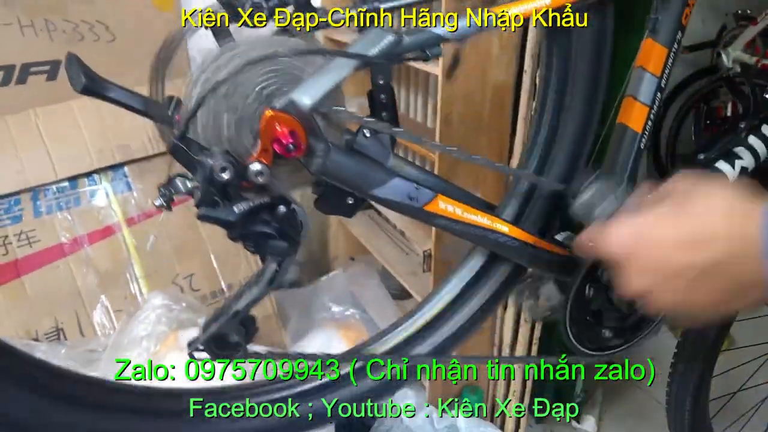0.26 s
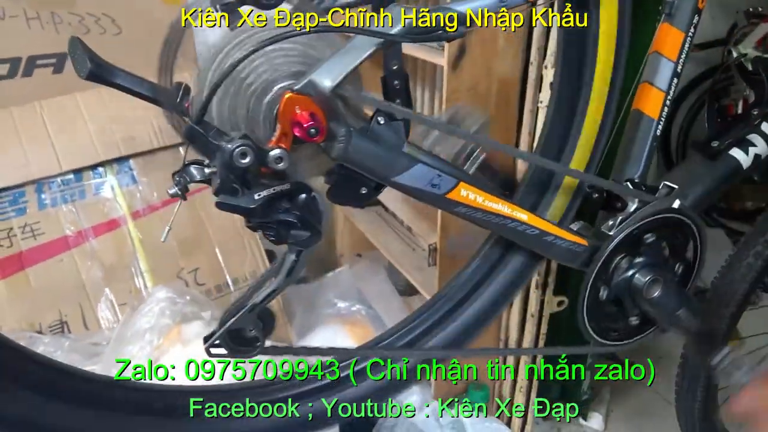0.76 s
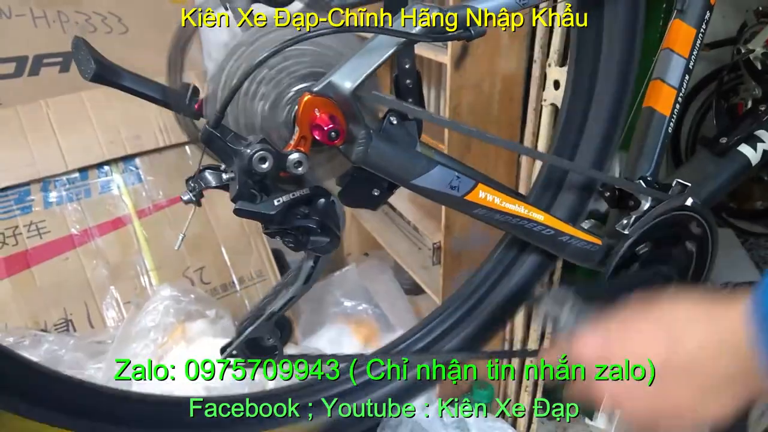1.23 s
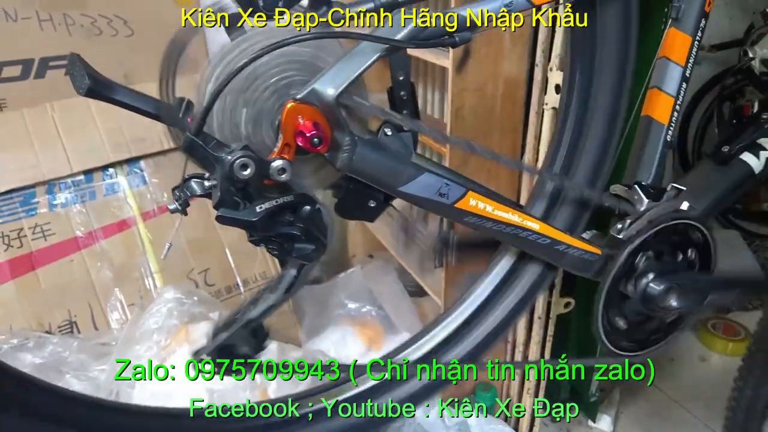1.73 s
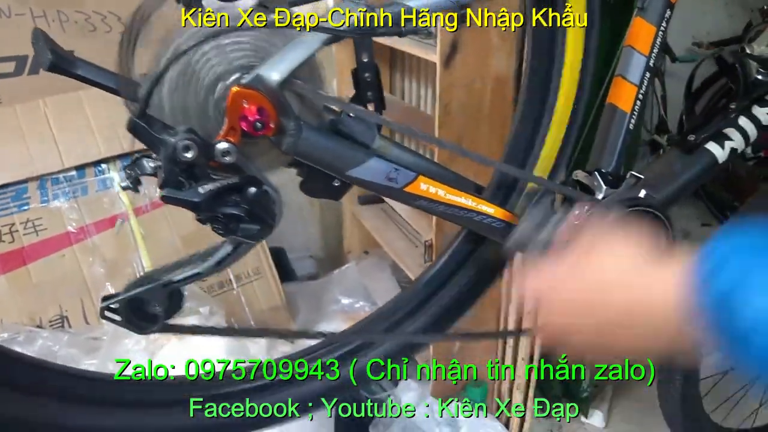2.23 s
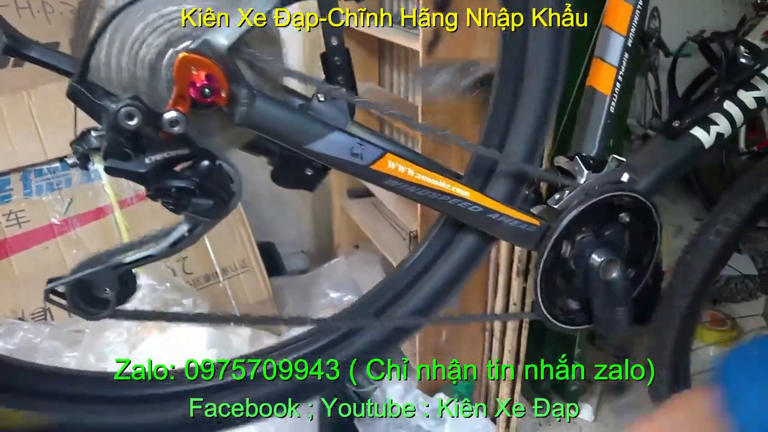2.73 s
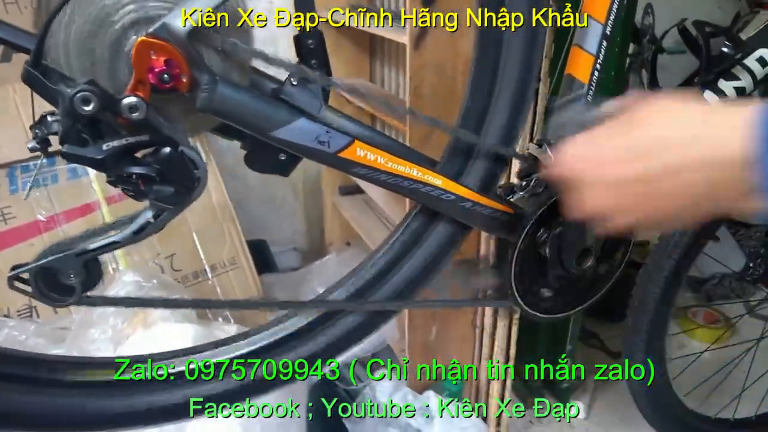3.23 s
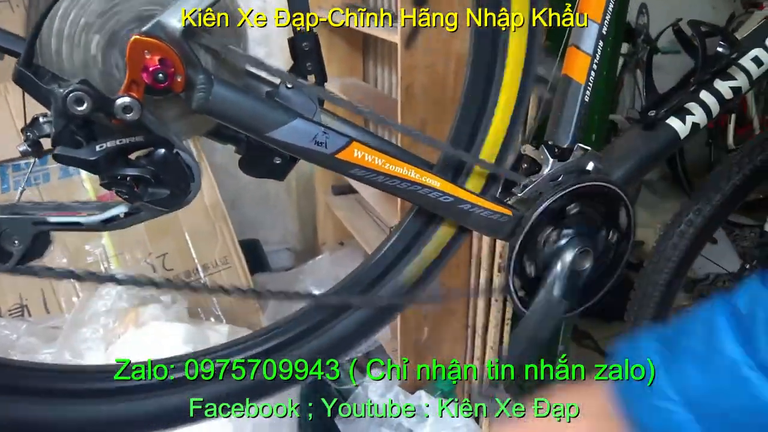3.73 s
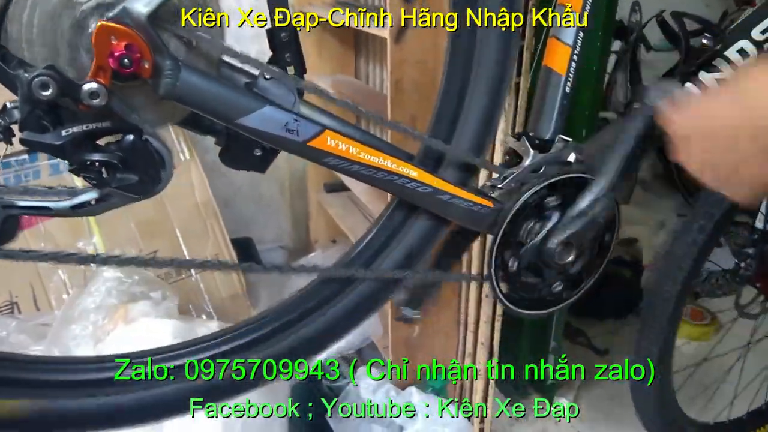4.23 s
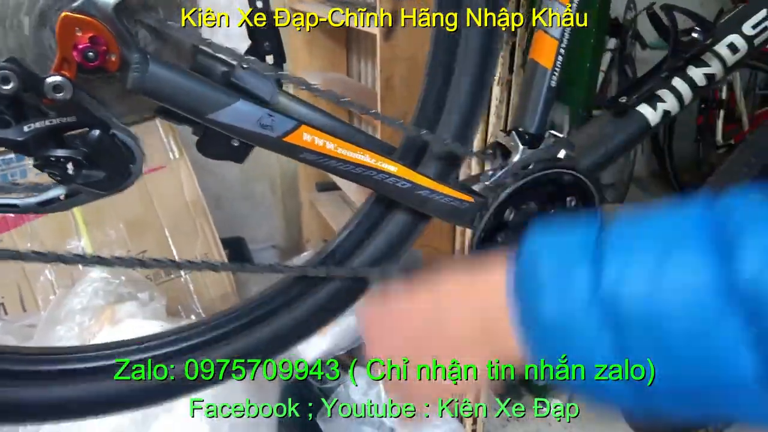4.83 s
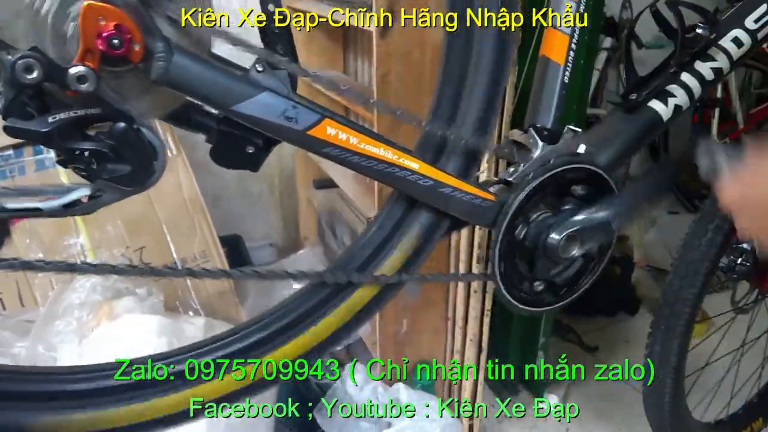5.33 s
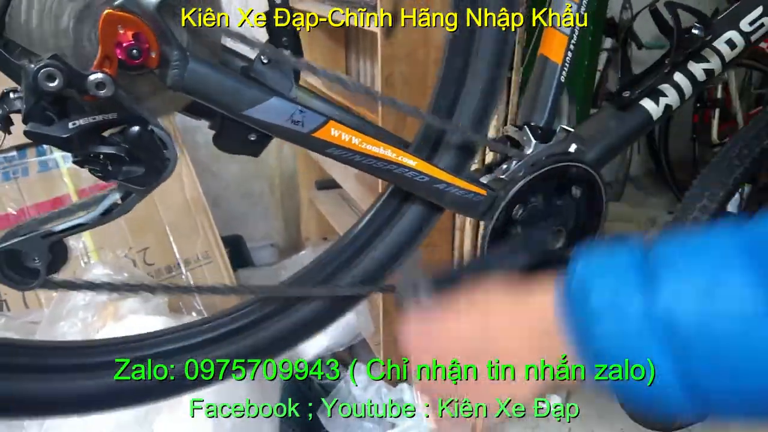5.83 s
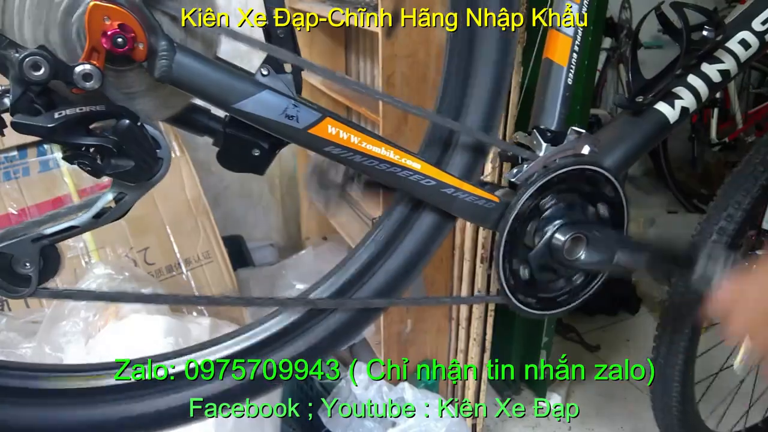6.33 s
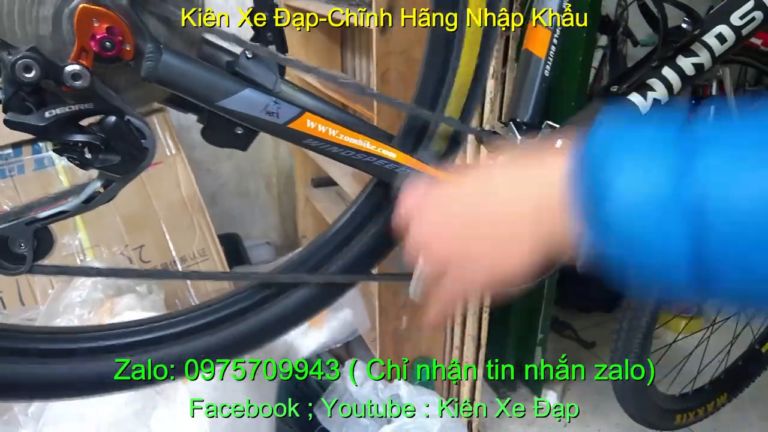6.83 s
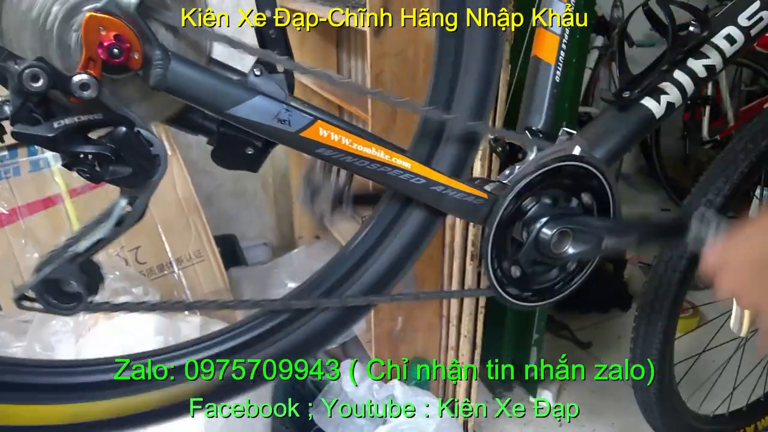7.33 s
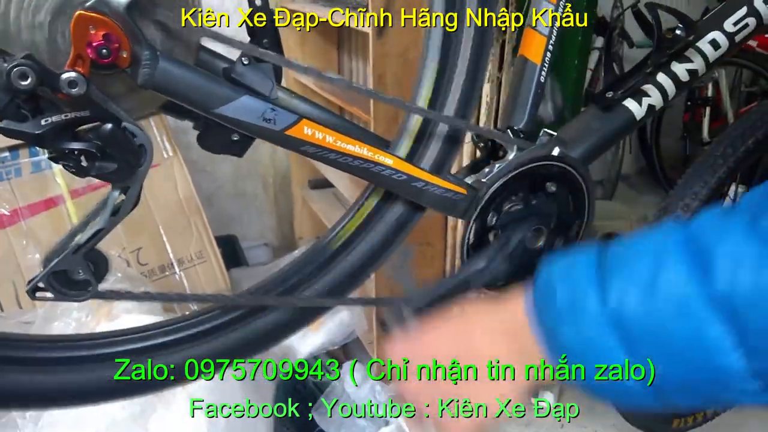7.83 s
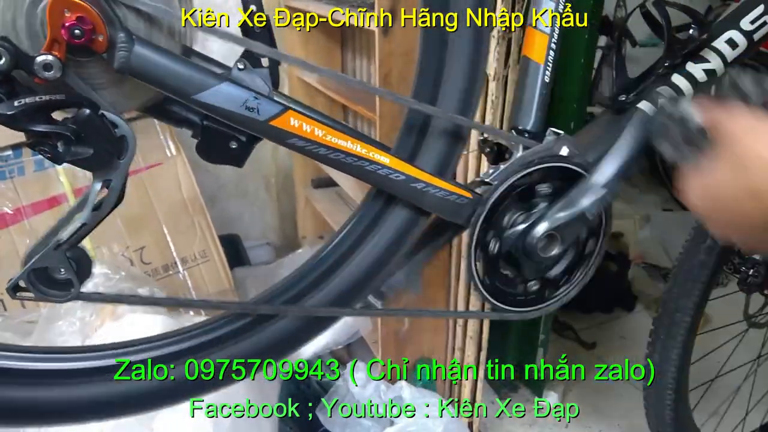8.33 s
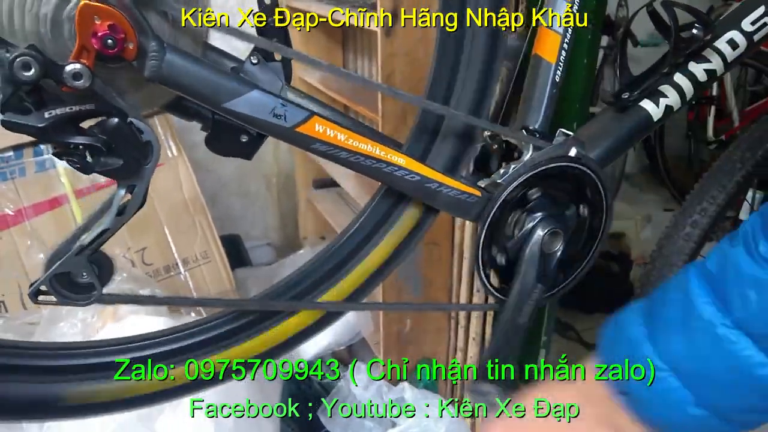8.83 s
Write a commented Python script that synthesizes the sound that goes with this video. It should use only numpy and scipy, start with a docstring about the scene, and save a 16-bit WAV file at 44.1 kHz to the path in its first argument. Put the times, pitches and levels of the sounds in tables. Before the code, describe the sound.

A hand-cranked bicycle chain ticks steadily over the rear sprockets, with runs of ringing clicks, clanks and scrapes as the gears shift.

```python
"""First comes a run of ringing clicks: a bicycle chain catching on sprocket teeth between two gears.
The bike is on a workstand in a small shop, cranked by hand while its rear gears are shifted.
The chain ticks link by link, scrapes along the sprockets and drops onto the next one with a clank.
The wheel whirrs softly and the stand rumbles. Dull knocks, most likely from the gear shifter,
ring through the frame."""
import sys
import numpy as np
from scipy import signal
from scipy.fft import rfft, irfft
from scipy.io import wavfile
from scipy.ndimage import uniform_filter1d

SR = 44100
rng = np.random.default_rng(int(sys.argv[2]) if len(sys.argv) > 2 else 0)


def store_pcm(level_fs):
    """Save levels as 16-bit WAV."""
    pcm = np.round(np.clip(level_fs, -1, 1) * 32767).astype(np.int16)
    wavfile.write(sys.argv[1], SR, np.atleast_2d(pcm).T)


N = 400428
TIME = np.arange(N) / SR
AGE = TIME[:SR // 5]  # seconds since a hit

# the chain catches on a tooth (time [s], strength [dB])
TOOTH_CLICKS = [(0.018, -18), (0.0807, -15.5), (.1337, -17), (0.189, -16.5), (.2478, -16), (0.3122, -17),
                (0.582, -18.5), (1.0059, -20.5), (2.9784, -17), (3.0791, -16.5), (3.1893, -18),
                (3.2328, -20.5), (3.2977, -15), (3.4438, -15.5), (3.5268, -15.5), (3.7337, -16),
                (3.811, -18.5), (3.8662, -16.5), (3.922, -17), (3.9687, -17), (4.0129, -15.5),
                (4.053, -17.5), (4.0952, -18), (4.135, -17), (4.1747, -18), (4.2173, -17), (4.261, -15.5),
                (4.3064, -15.5), (4.352, -16.5), (4.4, -16.5), (4.4536, -16.5), (4.537, -17.5),
                (4.6439, -17.5), (4.7162, -17.5), (4.7723, -16.5), (4.8182, -15.5), (4.8599, -16.5),
                (4.907, -16.5), (4.9571, -13.5), (5.0059, -16), (5.033, -16), (5.0728, -17.5),
                (5.1122, -16), (5.1578, -15), (5.1856, -15), (5.245, -16), (5.269, -18), (5.2932, -18.5),
                (5.339, -16.5), (5.3766, -15), (5.406, -20.5), (6.825, -17.5), (7.1248, -17.5)]
# the sprocket's ring compared with the click (time [s], level [dB])
RING_LEVEL = [(1, -14), (3, -10.5)]
# the chain drops onto a sprocket (time [s], clank [dB], crack [dB], how long links keep landing [s])
CHAIN_DROPS = [(1.411, -16.5, -15, .0095), (1.583, -18.5, -39, .0077), (2.071, -32, -19.5, 0.011),
               (3.1, -15, -15, 0.01), (3.721, -26.5, -19.5, .006), (7.078, -27, -37, 0.01),
               (7.14, -26.5, -24, 0.0086), (7.166, -22.5, -12.5, 0.0054)]
# how fast the chain runs (time [s], speed [links/s])
CHAIN_SPEED = [(0.0, 35.91), (0.61, 38.77), (1.44, 36.24), (1.89, 39.41), (2.09, 35.72), (2.39, 37.82),
               (4.02, 37.41), (5.65, 34.7), (6.32, 36.21), (6.77, 34.53), (7.22, 36.42), (7.73, 35.73),
               (8.31, 36.33), (9.08, 37.39)]
# how hard links land on the teeth (time [s], level [dB])
TICK_LEVEL = [(0.5, -43), (2.6, -44.5), (6.3, -46.5), (9, -44.5)]
# the chain rides between two sprockets (start [s], end [s])
BETWEEN_GEARS = [(0, 0.41), (3.75, 5.42)]
# stiff links snap into place (time [s], strength [dB])
LINK_SNAPS = [(1.963, -30.5), (2.011, -26), (2.18, -23.5), (2.244, -33), (2.267, -43), (2.687, -24),
              (2.7588, -26), (5.468, -21.5), (5.603, -23.5), (5.775, -29.5), (5.623, -28.5), (5.913, -21),
              (6.086, -27), (6.764, -40), (7.271, -21.5), (7.431, -27.5), (7.488, -32), (7.677, -23),
              (7.785, -24), (7.797, -28)]
# the derailleur (chain guide) presses the chain on a sprocket (start [s], length [s], level [dB])
SIDE_SCRAPES = [(1.422, 0.084, -36), (3.138, 0.071, -35), (4.99, 0.2, -30.5), (5.244, 0.054, -25),
                (5.32, 0.085, -35.5), (6.816, .065, -38.5), (6.933, 0.27, -37.5), (7.28, 0.055, -45)]
# the chain rubs while out of line (time [s], level [dB])
RUB_LEVEL = [(0, -43.5), (1.3, -57), (1.8, -48), (2.4, -53.5), (3.3, -44), (5.3, -44.5), (5.8, -54),
             (9, -59)]
# the stand's low rumble (time [s], level [dB])
RUMBLE_LEVEL = [(0, -63.5), (4.2, -61), (6.5, -62.5), (8.3, -62), (9.08, -49)]
# shifter and crank knock on the frame (time [s], blow [dB], low ring [dB], upper ring [dB])
FRAME_KNOCKS = [(1.502, -40.5, -48.5, -58), (4.775, -36.5, -59, -70), (5.288, -34.5, -45, -60),
                (6.139, -53, -56, -63), (6.195, -57, -60, -79), (6.895, -36.5, -69, -54),
                (7.371, -26, -35.5, -43), (7.535, -47, -48, -63), (7.632, -43.5, -56, -73),
                (8.127, -50.5, -52.5, -70), (8.436, -31, -36, -38), (8.485, -45, -46, -42),
                (9.007, -40, -69, -49.5)]
# a faint tone in the frame (start [s], length [s], level [dB])
FRAME_SINGING = [(8.47, 0.25, -65), (8.825, 0.042, -48.5), (8.98, .1, -61.5)]

# The tones each part rings with (pitch [Hz], level [dB], t60 [s]); t60 is the time to fade by 60 dB.
SPROCKET_TONES = [(2012, -18, .16), (2198, -12, .11), (2375, -4, .06), (2452, 0, .09), (2735, -2, .06),
                  (2808, -1, .07), (2910, -4, .045), (3230, -7, .05), (3560, -6, .07), (3760, -5, .05),
                  (4565, -20, .16), (4922, -13, .2), (5720, 0, .04), (9205, -4, .045)]
STACK_TONES = [(913, -23, 0.049), (1037, -20.5, 0.039), (1370, -44, 0.056), (2125, -11, 0.044),
               (2740, -25, 0.089), (2640, -16, 0.086), (3660, -12, 0.038), (3645, 6, 0.015),
               (3620, -4, 0.012), (3960, -17, 0.02), (6040, -10, 0.033)]  # all the sprockets together
CAGE_TONES = [(3220, -19, 0.014), (3426, 3, 0.042), (3580, -8, 0.049), (3740, -39, .04), (5100, -10, .02),
              (9000, -15, .02)]  # the derailleur's pulley and its cage
FRAME_TONES = [(175, -12, .2), (356, -1, .21), (436, -7, .42), (624, -13, .3), (886, 0, .5), (958, -9, .3),
               (1227, -10, .35), (1324, -8, .2), (1408, -8, .2), (1780, -5, .24), (2014, -3, .24),
               (2320, -9, .2), (2460, -4, .15), (2740, -11, .25)]

# The colour of each noise, from bass to treble (frequency [Hz], relative level [dB])
CRACK_COLOUR = [(300, -40), (1500, -10.5), (2400, 3), (3700, 6), (4400, -3), (5800, 8.5), (6800, -1.5),
                (8600, 2), (9200, 4), (10200, 0.5), (12000, -1.5), (14000, 3), (15500, 2), (17000, 10.5)]
THUD_COLOUR = [(40, -29), (110, -17), (175, 4), (270, 1.5), (400, -18), (580, -16), (1000, 11), (1500, 14),
               (2500, -21), (8000, -42)]
CLANK_COLOUR = [(200, -26.5), (800, -19.5), (1100, -14), (1700, -19), (2500, -6.5), (3050, -12),
                (3600, -3.5), (4400, -10.5), (5300, -15.5), (6500, -14.5), (9000, -24), (16000, -24)]
TICK_COLOUR = [(300, -21), (1500, -19), (2700, -5), (3500, -0.5), (4300, 0.5), (5600, 4.5), (7000, -3),
               (8300, -2), (9600, 0.5), (11500, -8.5), (16000, -10)]
SCRAPE_COLOUR = [(100, -15), (250, -3.5), (500, -7.5), (1200, 0), (2200, -1.5), (2800, 6), (3500, 8.5),
                 (4500, 3.5), (6000, 3), (8000, 2), (10000, -1), (12000, -4.5), (16000, -8.5)]
SHOP_COLOUR = [(12, -35), (20, 4), (60, 0), (116, -7.5), (158, 9), (459, -1), (802, 4), (1910, -2.5),
               (3160, -3), (3440, -4.5), (4060, -7.5), (5530, -29), (6360, -29), (9140, -26.5),
               (16000, -35)]
RUMBLE_COLOUR = [(15, -29), (35, -25), (52, -5), (68, -12.5), (95, -14), (200, -26), (600, -32.5)]
BLOW_COLOUR = [(60, -27), (130, -21), (220, 0), (400, -4), (650, -2), (1000, -0.5), (1400, -1.5), (2100, 2),
               (3000, 0.5), (3800, 1), (5000, -10.5), (8000, -17), (16000, -25)]

# how long the shop echoes (frequency [Hz], t60 [s])
ECHO_FADE = [(150, 0.47), (1000, 0.24), (3000, 0.19), (8000, 0.078), (16000, 0.15)]
# how alike the two microphones sound (frequency [Hz], likeness [0 to 1])
MIC_LIKENESS = [(100, 0.82), (300, 0.7), (600, 0.58), (1200, 0.46), (2400, 0.11), (8000, 0)]
# which microphone is louder (frequency [Hz], left minus right [dB])
MIC_BALANCE = [(60, -2), (200, -5), (400, -4.5), (1300, -1), (2400, -3.5), (4400, -6), (6200, -1.5),
               (8100, 2.5), (10500, 1.5), (12500, 3), (15000, -0.5)]


def gain_of(db):
    """Turns decibels into a number to multiply a sound by."""
    return 10 ** (np.asarray(db) / 20)


def evened(x):
    """Scales a signal to an average power of 1."""
    return x / np.sqrt(np.mean(x ** 2) + 1e-20)


def at_pitch(table, hz):
    """Reads a table between its rows, on a log-frequency axis."""
    row_hz, value = np.transpose(table)
    return np.interp(np.log(hz + 1), np.log(row_hz + 1), value)


def at_time(table, s):
    """Reads a table at the times s."""
    return np.interp(s, *np.transpose(table))


def add(mix, s, sound):
    """Adds a stereo sound at time s."""
    part = mix[:, max(round(s * SR), 0):][:, :sound.shape[1]]
    part += sound[:, :part.shape[1]]


def tint(x, colour, size=4096):
    """Gives a sound a colour, with a filter that never rings ahead of a hit."""
    log_gain = np.log(gain_of(at_pitch(colour, abs(np.fft.fftfreq(size, 1 / SR)))))
    response = np.exp(np.conj(signal.hilbert(log_gain)))
    taps = np.fft.ifft(response).real[:size // 2]
    return signal.oaconvolve(x, taps[None] / np.linalg.norm(taps), axes=1)[:, :x.shape[1]]


def chatter(t60, hold=0, grain=0.48, rise=0.00029):
    """Steel parts rattle together: a lumpy burst of tiny impacts that holds, then dies."""
    lumps = np.exp(grain * np.repeat(rng.standard_normal(len(AGE)), 30)[:len(AGE)])
    swell = (1 - np.exp(-AGE / rise)) * gain_of(-60 * np.maximum(AGE - hold, 0) / t60)
    burst = rng.standard_normal((2, len(AGE))) * lumps * swell
    return burst / np.sqrt(np.sum(burst ** 2) / (2 * SR / 100) + 1e-20)  # same energy every time


def ring(tones, t, scatter_db, detune, blur_hz):
    """Struck metal rings with fading tones. Each blow varies them; loose contact blurs their pitch."""
    hz, db, t60 = np.transpose(tones)[:, :, None]
    strength, shift = rng.standard_normal((2, len(tones), 1))
    drift = np.cumsum(rng.standard_normal((len(tones), len(t))), 1) * np.sqrt(2 * np.pi * blur_hz / SR)
    fade = gain_of(db + scatter_db * strength - 60 * t / t60)
    cycles = hz * (1 + detune * shift) * t + rng.random((2, len(tones), 1))
    return fade * np.cos(2 * np.pi * cycles + drift) * (1 - np.exp(-t / 0.0014))


def sprockets(climb_s=0.0045, climb_db=-20):
    """A link climbs a tooth and slips off with a crack, a ring and a thud; a dropping chain clanks too."""
    crack, rings, thud, clank = np.zeros((4, 2, N))
    for s, db in TOOTH_CLICKS:
        add(crack, s - climb_s, gain_of(db + climb_db) * chatter(t60=0.044, rise=0.0082))
        strike = gain_of(-7) * chatter(t60=0.016, grain=0.3, rise=0.0003)
        rattle = gain_of(-5) * chatter(t60=0.036, grain=0.053)
        add(crack, s, gain_of(db) * (strike + rattle))
        sprocket = ring(SPROCKET_TONES, AGE, scatter_db=3, detune=0.003, blur_hz=14).sum(1)
        add(rings, s, gain_of(db + at_time(RING_LEVEL, s)) * sprocket)
        add(thud, s, gain_of(db - 32.5) * chatter(t60=0.051))
    for s, clank_db, crack_db, hold in CHAIN_DROPS:
        add(clank, s - 2 * climb_s, gain_of(clank_db + climb_db) * chatter(t60=0.086, rise=0.0099))
        add(clank, s, gain_of(clank_db) * chatter(t60=0.03, hold=hold, grain=0.7, rise=0.0015))
        add(crack, s, gain_of(crack_db) * chatter(t60=0.032, hold=hold, grain=0.3, rise=0.0008))
        stack = ring(STACK_TONES, AGE, scatter_db=1.5, detune=0.005, blur_hz=25).sum(1)
        add(rings, s + hold / 2, gain_of(clank_db) * stack)
        add(thud, s, gain_of(clank_db - 15) * chatter(t60=0.05, hold=hold, rise=0.0045))
    return tint(crack, CRACK_COLOUR) + rings + tint(thud, THUD_COLOUR) + tint(clank, CLANK_COLOUR)


def links_passed():
    """How many links have run by at each moment."""
    return np.cumsum(at_time(CHAIN_SPEED, TIME)) / SR


def running_chain(lead_s=0.0017, jitter_s=0.0011, uneven_db=5, between_gears_db=-18):
    """Each link touches the pulley, lands on a tooth and bounces, ringing the cage; stiff ones snap."""
    ticks, cage, snaps = np.zeros((3, 2, N))
    landings = TIME[1:][np.diff(np.floor(links_passed())) > 0] - lead_s
    for s, luck in zip(landings, rng.standard_normal((len(landings), 6))):
        riding_up = any(start < s < end for start, end in BETWEEN_GEARS)
        db = at_time(TICK_LEVEL, s) + between_gears_db * riding_up
        s = s + jitter_s * luck[0]
        land = gain_of(db + uneven_db * np.tanh(luck[1])) * chatter(t60=0.018, grain=0.3, rise=0.0004)
        touch = gain_of(db - 8 + 3 * luck[3]) * chatter(t60=0.02, grain=0.3)
        bounce = gain_of(db - 10 + 3 * luck[5]) * chatter(t60=0.02, grain=0.3)
        add(ticks, s - 0.0046 + 0.0015 * luck[2], touch)
        add(ticks, s, land)
        add(ticks, s + 0.0073 + 0.002 * luck[4], bounce)
        ping = ring(CAGE_TONES, AGE, scatter_db=1.5, detune=0.005, blur_hz=50).sum(1)
        add(cage, s, gain_of(db - 1) * ping)
    for s, db in LINK_SNAPS:
        snap = chatter(t60=0.043, grain=0.42, rise=0.00024)
        add(snaps, s, gain_of(db) * snap / abs(snap).max())
    graze = 1.07 * tint(snaps, SCRAPE_COLOUR)  # a stiff link also grazes a tooth
    return tint(ticks + 0.36 * snaps, TICK_COLOUR) + cage + graze


def swells(rows, rise, t60):
    """Loudness of swells that rise, hold and fade, from rows of (start [s], length [s], level [dB])."""
    power = np.zeros(N)
    for start, length, db in rows:
        first = max(round(start * SR), 0)
        age = TIME[:N - first][:round((length + t60) * SR)]
        fade = gain_of(db - 60 * np.maximum(age - length, 0) / t60)
        power[first:first + len(age)] += (np.minimum(age / rise, 1) * fade) ** 2
    return np.sqrt(power)


def scraping(grains_per_s=260, grain_s=0.0017, smooth_rub=0.4, settle_s=0.032, settle_db=-37.5):
    """The links' sides grate over the teeth when pressed, settling after a drop or out of line."""
    pressed = swells(SIDE_SCRAPES, rise=0.0067, t60=0.17)
    settling = swells([(s, settle_s, settle_db) for s, *_ in CHAIN_DROPS], rise=0.0067, t60=0.42)
    level = np.sqrt(pressed ** 2 + settling ** 2 + gain_of(at_time(RUB_LEVEL, TIME)) ** 2)
    grains = rng.rayleigh(1, N) * (rng.random(N) < grains_per_s / SR)
    grain_power = signal.lfilter([1], [1, -np.exp(-1 / (grain_s * SR))], grains ** 2)
    link_pulse = gain_of(np.cos(2 * np.pi * links_passed()))  # 1 dB up and down with each link
    grit = (evened(np.sqrt(grain_power)) + smooth_rub) * link_pulse * rng.standard_normal((2, N))
    return tint(evened(grit) * level, SCRAPE_COLOUR)


def patchy(x, depth_db, frames=9, bands=5):
    """Lets small patches of pitch and time swell and sink at random."""
    spectra = signal.stft(x, nperseg=512, noverlap=384)[2]
    patches = uniform_filter1d(rng.standard_normal(spectra.shape[1:]), bands, 0)
    patches = evened(uniform_filter1d(patches, frames, 1))
    return signal.istft(spectra * gain_of(depth_db * patches), nperseg=512, noverlap=384)[1][:, :N]


def waver(slow_hz=0.54, fast_hz=5, count=16):
    """A slow random wobble, made by adding slow waves."""
    hz, s = np.geomspace(slow_hz, fast_hz, count)[:, None], TIME[::SR // 100]
    waves = np.sin(2 * np.pi * (hz * s + rng.random((count, 1)))) / np.sqrt(hz)
    return np.interp(TIME, s, evened(waves.sum(0)))


def shop(waver_db=2.2):
    """Room noise and the wheel's whirr over the stand's rumble; all swell when the stand is jolted."""
    air, shake = rng.standard_normal((2, 2, N))
    jolts = [(s, 0, db - 35) for s, db, *_ in CHAIN_DROPS]
    jolts += [(s, 0, db - 18.5) for s, db, *_ in FRAME_KNOCKS]
    jolts += [(s, length, db - 30) for s, length, db in SIDE_SCRAPES]
    jolted = swells(jolts, rise=0.012, t60=1.74)
    whirr = patchy(tint(air, SHOP_COLOUR), depth_db=3.5) * np.hypot(gain_of(-58), jolted)
    shaking = np.hypot(gain_of(at_time(RUMBLE_LEVEL, TIME)), gain_of(-7) * jolted)
    rumble = tint(shake, RUMBLE_COLOUR, size=16384) * shaking
    return (whirr + rumble) * gain_of(waver_db * waver())


def frame_knocks(split_hz=750, sing_hz=880, sing_blur_hz=45):
    """Dull blows set the frame's tubes ringing; near the end one faint tone sings on."""
    blows, rings = np.zeros((2, 2, N))
    is_low = np.transpose(FRAME_TONES)[0][:, None] < split_hz
    for s, blow_db, low_db, upper_db in FRAME_KNOCKS:
        add(blows, s, gain_of(blow_db) * chatter(t60=0.034, grain=0.8))
        tones = ring(FRAME_TONES, TIME[:SR * 2 // 3], scatter_db=1, detune=0.0007, blur_hz=2)[0]
        tubes = (gain_of(np.where(is_low, low_db, upper_db)) * tones).sum(0)
        add(rings, s, tubes * gain_of([[-1], [-5]]))  # louder on the left
    drift = np.cumsum(rng.standard_normal(N)) * np.sqrt(2 * np.pi * sing_blur_hz / SR)
    tone = evened(np.sin(2 * np.pi * sing_hz * TIME + drift))
    singing = tone * swells(FRAME_SINGING, rise=0.018, t60=0.64)
    return tint(blows, BLOW_COLOUR) + rings + singing * gain_of([[0], [-6]])


def room_echoes(x, gap_s=0.0039, slot_size=20):
    """Sound bounces off boxes and walls; each pitch range fades at its own speed."""
    taps = np.zeros((2, SR // 2))
    slots = np.arange(0, SR // 2 - slot_size, slot_size)
    delays = slots + rng.integers(0, slot_size, (2, len(slots)))  # one echo in each slot
    np.put_along_axis(taps, delays, rng.choice([-1., 1.], delays.shape) * (delays > gap_s * SR), 1)
    hz, t, spectra = signal.stft(taps, SR, nperseg=256)
    fade = gain_of(-60 * t / at_pitch(ECHO_FADE, hz)[:, None])
    tail = signal.istft(spectra * fade, SR, nperseg=256)[1]
    return signal.fftconvolve(x, tail / np.linalg.norm(tail[0]), axes=1)[:, :N]


def scene():
    """The bicycle, close by, and the shop around it."""
    chain, teeth, frame = running_chain() + scraping(), sprockets(), frame_knocks()
    echoes = room_echoes(gain_of(-13.5) * chain + gain_of(-6) * teeth + gain_of(-0.5) * frame)
    return chain + teeth + frame + echoes + shop()


def record(dry, top_hz=15950):
    """Two microphones hear much the same bass but different treble; the very top is cut off."""
    hz = np.fft.rfftfreq(N, 1 / SR)
    left, other = rfft(dry)
    likeness, lean_db = at_pitch(MIC_LIKENESS, hz), at_pitch(MIC_BALANCE, hz) / 2
    right = likeness * left + np.sqrt(1 - likeness ** 2) * other
    pair = irfft(np.array([left * gain_of(lean_db), right * gain_of(-lean_db)]), N)
    low_pass = signal.firwin(401, top_hz, window=("kaiser", 8), fs=SR)
    return signal.oaconvolve(pair, low_pass[None], "same")


dry = scene()
out = record(dry)
store_pcm(out)
```